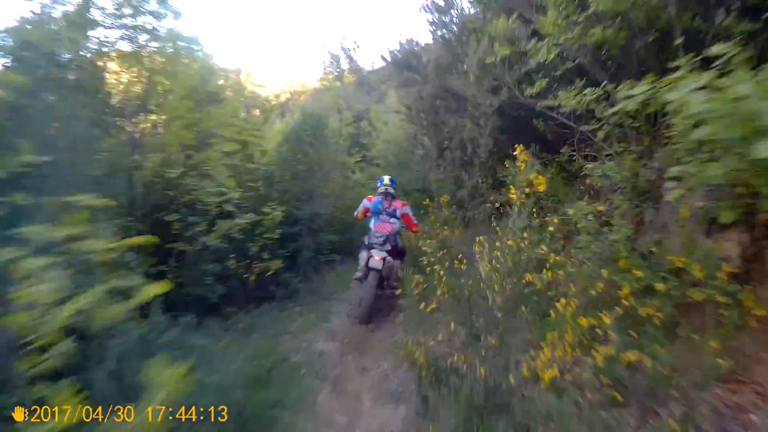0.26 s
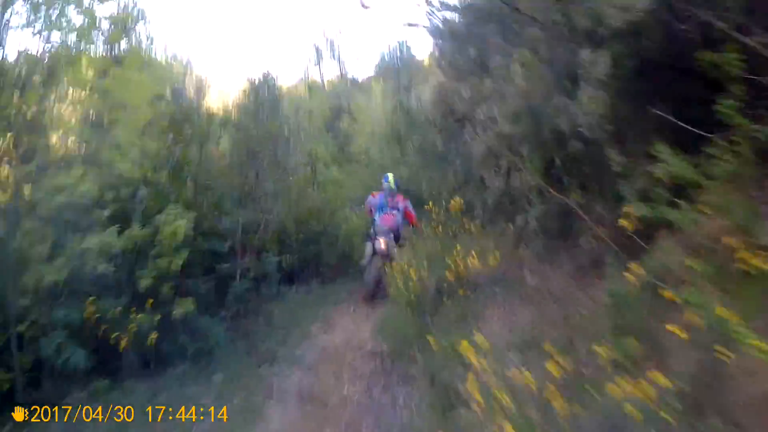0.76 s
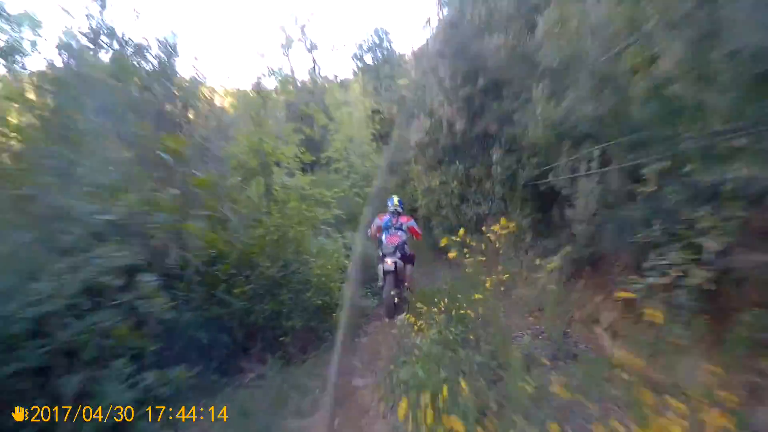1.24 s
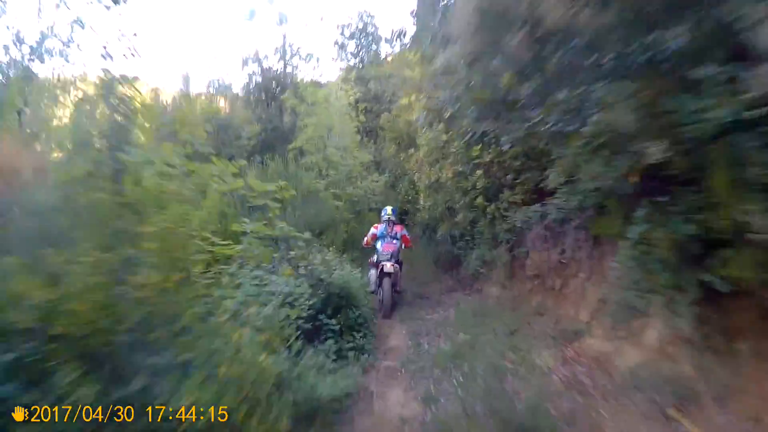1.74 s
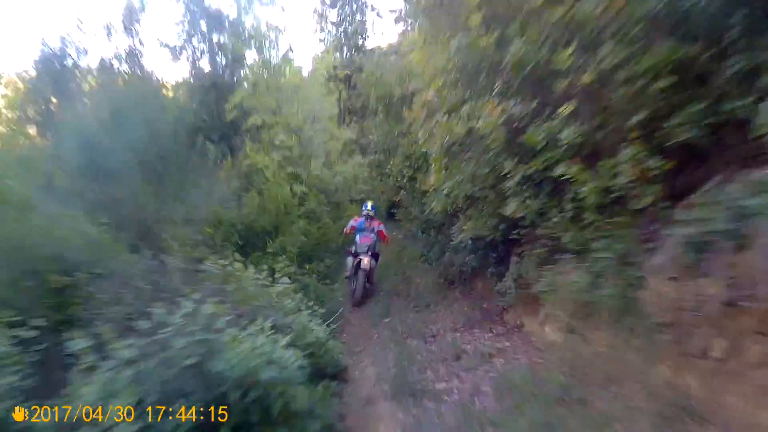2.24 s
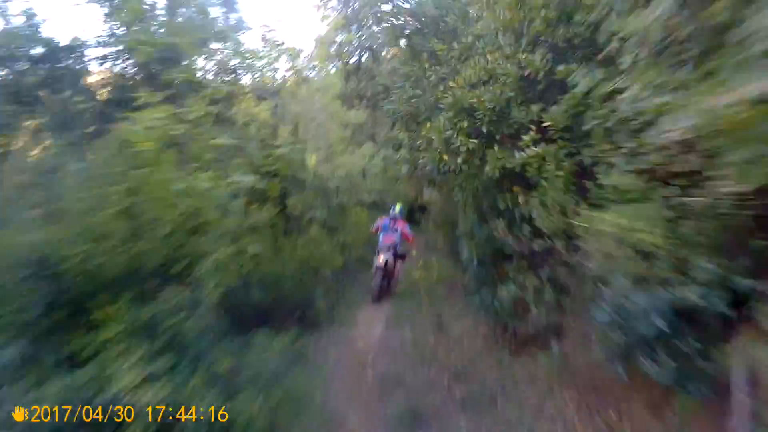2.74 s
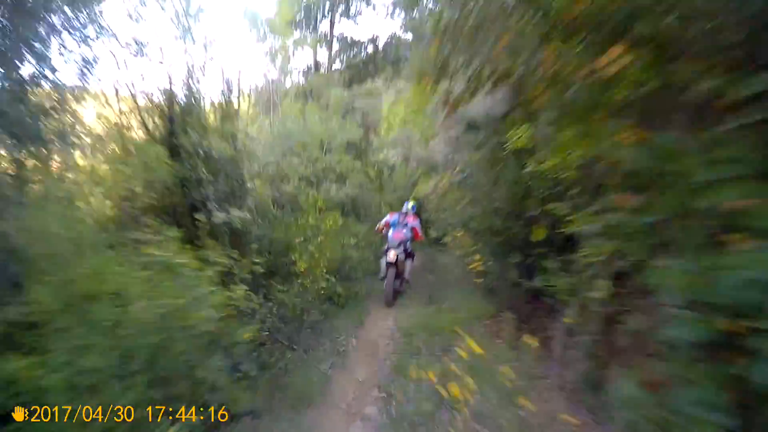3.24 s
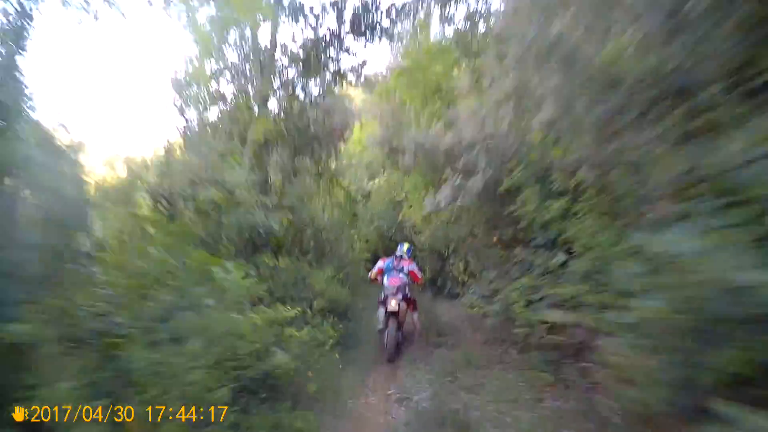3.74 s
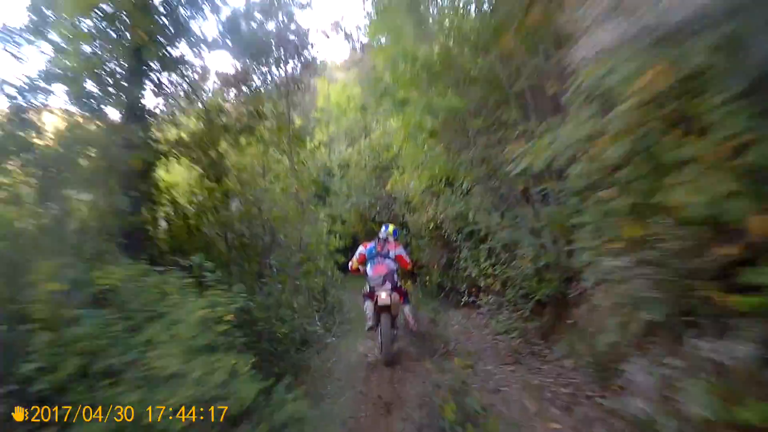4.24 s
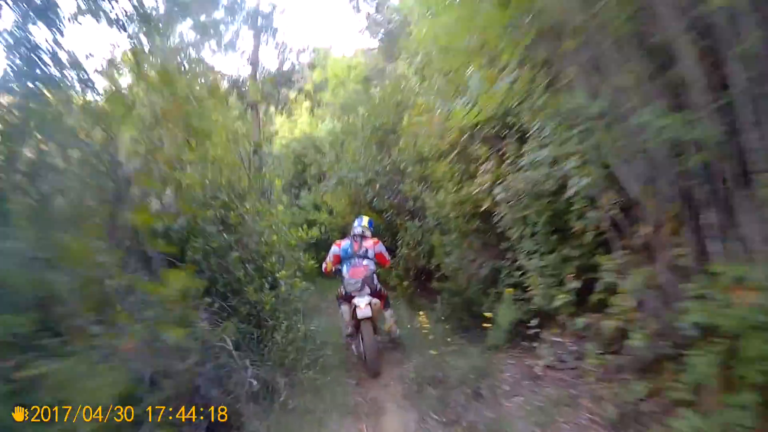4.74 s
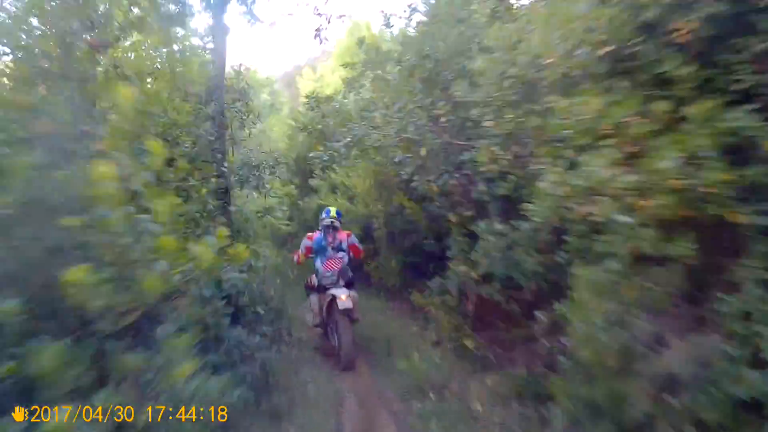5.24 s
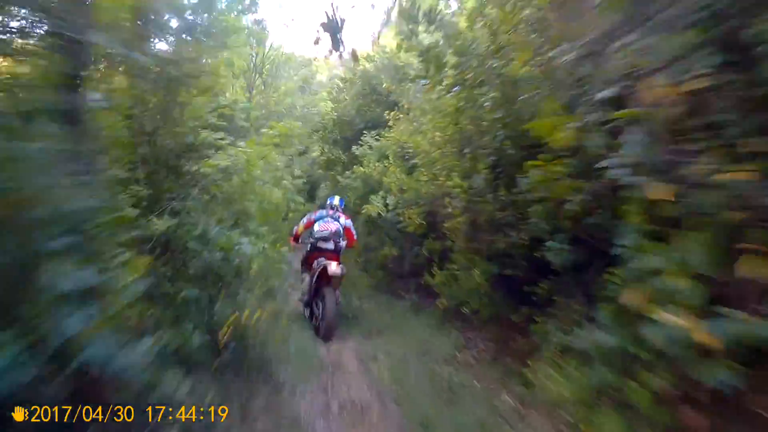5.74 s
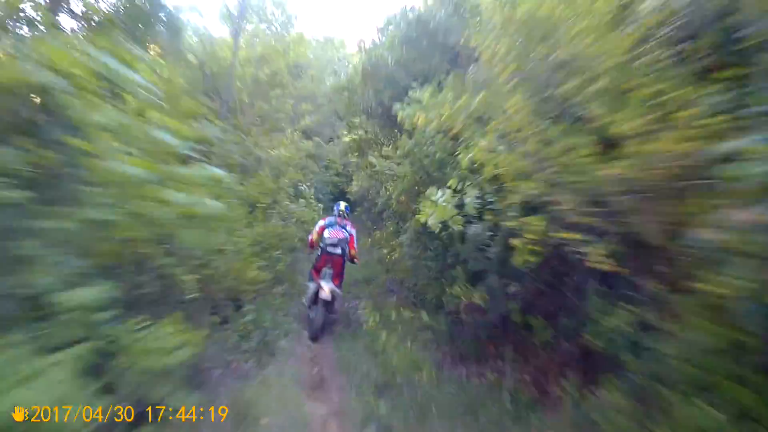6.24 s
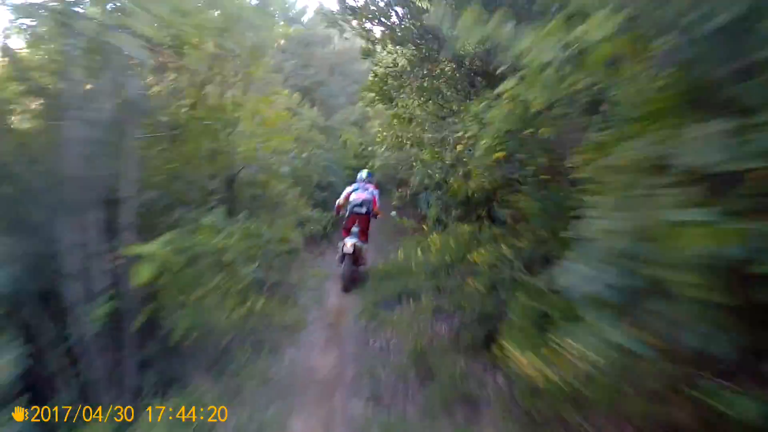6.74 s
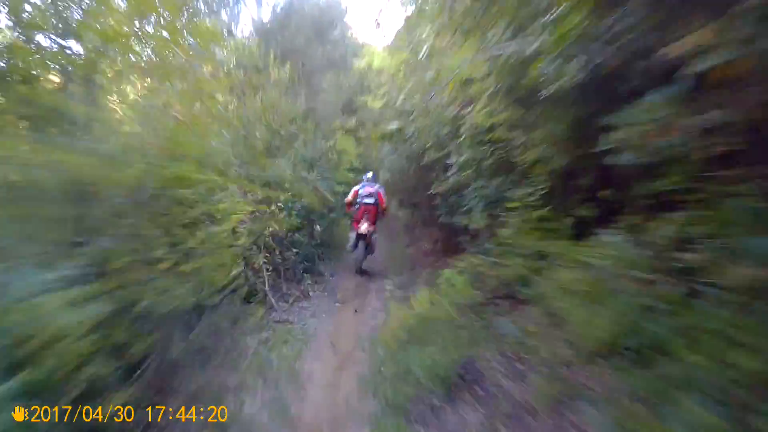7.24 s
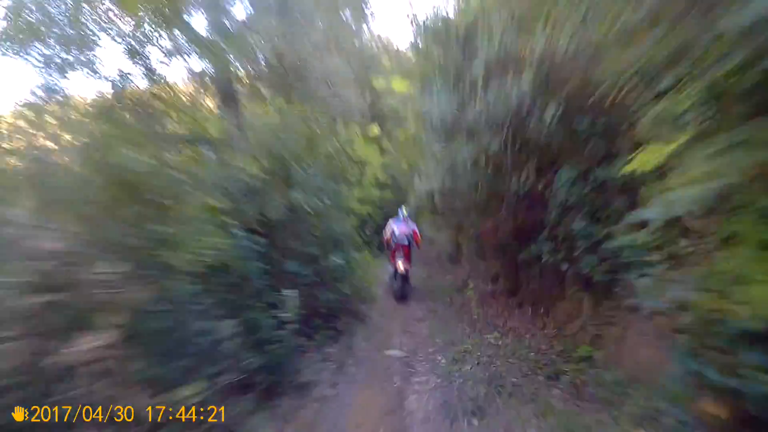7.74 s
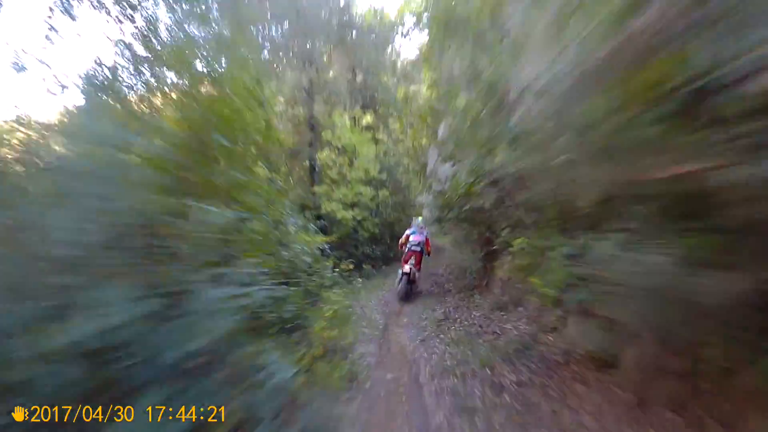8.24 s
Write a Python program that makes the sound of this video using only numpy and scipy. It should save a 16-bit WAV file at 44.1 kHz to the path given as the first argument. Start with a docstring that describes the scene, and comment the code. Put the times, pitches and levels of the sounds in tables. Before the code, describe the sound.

Muffled dirt bike engine and dull wind rumble inside a camera case, faint hiss rising with throttle, broken by sharp branch cracks.

```python
"""Dirt bike on a bushy trail

A camera in a closed case rides on a dirt bike behind a second bike; a faint hum comes and goes.
Wind buffets the case: slow narrow-band noise in gusts over a dull rumble. The engine shakes it with a sine
once a turn and thumps its pipe with pulses; gas and air hiss in the hollow of the case as resonant noise.
The bike ahead, slower pulses with an echo, pulls away for a while.
Twigs tick and whip on the shell: short pushes and scrapes that ring its modes."""
import sys
import numpy as np
from scipy import signal
from scipy.fft import next_fast_len
from scipy.io import wavfile
from scipy.ndimage import uniform_filter1d

SR = 44100
rng = np.random.default_rng(int(sys.argv[2]) if len(sys.argv) > 2 else 0)


def inscribe(sig):
    """Save sig as 16-bit PCM at rate SR to the path in sys.argv[1].

    A 1-D sig is mono; a 2-D sig holds one channel per row.
    Samples are clipped to [-1, 1] before scaling.
    """
    pcm = np.round(np.clip(np.atleast_2d(sig).T, -1, 1) * 32767)
    wavfile.write(sys.argv[1], SR, pcm.astype(np.int16))


N = 374713
T = np.arange(N) / SR

# engine load, heard as gas hiss: (time [s], level [dB])
LOAD = [(0.0, -65.5), (1.15, -66.5), (1.45, -61.5), (1.9, -63.5), (2.39, -60.5), (2.7, -60.5),
        (3.27, -59.5), (3.77, -63.5), (5.3, -66.5), (6.43, -61.5), (7.5, -59), (8.5, -59)]
# All mode tables: (centre [Hz], bandwidth per filter pass [Hz], relative gain [dB])


def undb(db):
    """Decibels to amplitude gain."""
    return 10 ** (np.asarray(db) / 20)


def unit(x):
    """Scale to rms 1."""
    return x / np.sqrt(np.mean(x ** 2))


def columns(table):
    """Table columns joined by straight lines in time."""
    time_s, *rest = np.transpose(table)
    return [np.interp(T, time_s, column) for column in rest]


def ring(x, modes, order=1):
    """Sum of resonances with alternating sign; order 2 darkens the valleys."""
    out = 0
    for k, (hz, width_hz, db) in enumerate(modes):
        b, a = signal.iirpeak(hz, hz / width_hz, fs=SR)
        y = x
        for _ in range(order):
            y = signal.lfilter(b, a, y)
        out = out + (-1) ** k * undb(db) * y
    return out


def hiss(modes, envelope=1.0):
    """White noise under an envelope, through resonances twice, at rms 1."""
    return unit(ring(envelope * rng.standard_normal(N), modes, order=2))


def walk(rate_hz):
    """Random levels held 1 / rate_hz and smoothed by two moving averages of that length."""
    hold = int(SR / rate_hz)
    steps = np.repeat(rng.standard_normal(N // hold + 1), hold)
    return uniform_filter1d(uniform_filter1d(steps, hold), hold)[:N]


def firings(hz, wobble, scatter_db, skip_db):
    """One pulse a cycle, uneven in size, odd ones cut by skip_db; returns cycle count, pulses, sizes."""
    turns = np.cumsum(hz * (1 + wobble * walk(30))) / SR
    count = turns.astype(int)
    cycles = N // 400
    size_db = scatter_db * rng.standard_normal(cycles) - skip_db * (np.arange(cycles) % 2)
    size = undb(size_db)[count]
    starts = np.diff(count, prepend=0) > 0
    return turns, size * starts, size


def swells(table):
    """Pitch and gain of tones that glide evenly while they swell and fade."""
    start_s, length_s, start_hz, end_hz, db = np.transpose(table)
    knots_s = np.ravel([start_s, start_s + length_s], "F")
    hz = np.interp(T, knots_s, np.ravel([start_hz, end_hz], "F"))
    place = np.clip((T - start_s[:, None]) / length_s[:, None], 0, 1)
    arch = np.sqrt(np.abs(np.sin(np.pi * place)))
    return hz, (undb(db)[:, None] * arch).sum(axis=0)


def load():
    """Load above or below its mean, in dB."""
    gas_db, = columns(LOAD)
    return gas_db - gas_db.mean()


def hum():
    """Faint low sine, wavering in pitch and level, that comes and goes."""
    # (start [s], length [s], start pitch [Hz], end pitch [Hz], level [dB])
    hum_swells = [(0.0, .9, 130, 111.8, -67.5), (1.95, 0.94, 107, 107.2, -69),
                  (7.65, 0.925, 113, 103.1, -62)]
    hz, gain = swells(hum_swells)
    tone = np.sin(2 * np.pi * np.cumsum(hz * (1 + 0.023 * walk(5))) / SR)
    return gain * undb(4.1 * walk(3.6)) * tone


def wind():
    """Slow pressure swings whose size follows the gusts, over a dull rumble."""
    # gusts that thump the case: (middle [s], full width at 1/e [s], level [dB])
    gusts = [(0.04, 0.11, -42), (0.16, 0.09, -39.5), (0.29, 0.042, -43.5), (0.5, 0.25, -46.5),
             (0.66, 0.07, -43), (0.84, .12, -31.5), (1.04, 0.37, -51.5), (1.3, 0.18, -41.5),
             (1.75, .16, -47), (1.89, 0.18, -46.5), (2.27, 0.049, -50), (2.419, 0.27, -49),
             (2.98, 0.15, -41.5), (3.23, .16, -42), (3.361, 0.042, -50), (3.471, 0.16, -45.5),
             (3.829, 0.18, -50.5), (4.04, 0.097, -50), (4.2, 0.076, -50), (4.44, 0.12, -38),
             (4.72, 0.1, -42.5), (4.879, 0.18, -50.5), (5.44, 0.049, -32.5), (5.57, 0.15, -40.5),
             (5.79, 0.164, -43.5), (6.05, .08, -42.5), (6.17, .12, -44.5), (6.42, .2, -40.5),
             (6.55, 0.046, -56), (6.86, 0.18, -45.5), (7.02, 0.092, -45), (7.14, 0.16, -34),
             (7.39, 0.11, -51), (7.58, 0.1, -40), (8.02, 0.12, -49.5), (8.37, .12, -45)]
    calm_db = -59  # buffeting between gusts
    rumble_db, rumble_follow = -61.5, 0.43  # level at mean load; dB per dB of load

    noise = ring(rng.standard_normal(N), [(26.37, 15.8, 0)], order=2)
    swing = signal.hilbert(noise, next_fast_len(N))[:N]
    swing = swing.real / np.abs(swing) ** 0.62  # eddies of like strength
    strength = undb(calm_db)
    for middle_s, width_s, db in gusts:
        strength = strength + undb(db) * np.exp(-(2 * (T - middle_s) / width_s) ** 2)
    lowpass = signal.butter(3, 62, fs=SR, output="sos")
    buffet = signal.sosfiltfilt(lowpass, unit(swing) * strength)

    rumble = ring(rng.standard_normal(N), [(70, 77, 3), (146, 238, 1.0), (430, 577, -5.5)])
    return buffet + unit(rumble) * undb(rumble_db + rumble_follow * load() + 0.77 * walk(5.0))


def bike_ahead():
    """Slow even thumps of a single cylinder, each answered from the far end of its pipe."""
    # (time [s], firing rate [Hz], level [dB])
    ahead = [(4.3, 25.4, -57), (4.49, 26.86, -69.5), (4.92, 25.44, -61), (5.07, 28.24, -59),
             (5.24, 27.27, -65), (5.34, 30.08, -63.5), (5.76, 29.68, -61.5), (6.03, 32.94, -61.5),
             (6.9, 37.3, -70)]
    far_pipe_modes = [(136, 77, 2), (263, 116, -1), (960, 180, -8.5)]
    echo_s, echo_gain = 0.0064, 1

    hz, level_db = columns(ahead)
    _, pulses, _ = firings(hz, wobble=.01, scatter_db=1.1, skip_db=0)
    pulses = pulses + echo_gain * np.roll(pulses, int(echo_s * SR))
    present = (T > ahead[0][0]) & (T < ahead[-1][0])
    heard = uniform_filter1d(1. * present, size=SR // 4)
    return unit(ring(pulses, far_pipe_modes)) * undb(level_db) * heard


def twigs():
    """Each touch is a short scrape that rings the shell, plus a push for its low modes."""
    # peak level per band: (time [s], jolt [dB], thud [dB], ping [dB], swish [dB], sizzle [dB], contact [ms])
    touches = [(0.6777, -66, -43, -55.5, -56, -73, 14), (0.7324, -50, -63, -54, -61, -77, 16),
               (0.7637, -44, -56, -53, -53, -75, 12), (0.787, -53, -45, -42.5, -69, -80, 3.8),
               (0.8777, -46.5, -42.5, -51.5, -72, -84, 9.3), (1.2574, -31, -24, -32.5, -47, -86, 11),
               (1.267, -28, -26, -12, -33, -70, 6), (1.2707, -40, -22, -21, -13, -42, 5.3),
               (1.2784, -42, -28, -12.5, -20, -22.5, 5), (1.2846, -39, -21, -18, -17, -50, 5),
               (1.2903, -34, -16.5, -20, -20, -50, 2.9), (1.2969, -33, -17, -18, -32, -38, 18.7),
               (1.314, -43, -19, -18.5, -48, -50, 5.6), (1.3183, -42, -22, -14, -50, -51, 11.5),
               (1.3259, -46, -21.5, -28, -32, -48, 13), (1.3311, -43, -16.5, -29, -50, -68, 4),
               (1.3423, -34, -33, -33, -34, -48, 11), (1.359, -52, -42, -26, -33, -50, 5.9),
               (1.3634, -42, -26.5, -22, -51, -49, 4), (1.3729, -43, -33, -43, -38, -60, 11),
               (1.3838, -54, -41, -37, -40, -55, 4.2), (2.951, -53, -52, -43, -65, -70, 5),
               (4.4444, -54, -45, -40.5, -72, -83, 3.6), (5.3286, -60, -51, -48.5, -59, -81, 5),
               (5.409, -55, -52, -55, -66, -83, 9), (5.43, -50, -50, -55, -66, -83, 9.4),
               (5.4404, -45, -45, -52, -57, -83, 7), (6.443, -56, -49, -40.5, -62, -77, 4.4),
               (6.674, -51, -37, -40, -56, -82, 5.6), (6.678, -55, -25.5, -27, -51, -62, 5.8),
               (6.6825, -38, -21, -35.5, -37, -34.5, 10.7), (6.6874, -44, -29, -39, -27, -39, 5.4),
               (6.697, -43, -28, -54, -50, -65, 14), (6.709, -41, -33.5, -60, -52, -63, 13),
               (7.1642, -54, -46, -48, -55, -79, 6.6), (7.3395, -59, -48, -46, -65, -77, 5),
               (7.531, -58, -56, -41, -68, -80, 4.1), (7.5584, -42, -38, -27, -26, -70, 4),
               (7.5613, -12, -12, -3, 0.5, -40, 4.73), (7.5678, -11.5, -15.5, -28, -31, -60, 3.2),
               (7.5748, -27, -18.5, -13, -16.5, -42.5, 7.4), (7.5794, -18.5, -16, -24, -18.5, -31.5, 2.9),
               (7.5829, -20, -9.5, -9.5, -18, -32.5, 1.6), (7.5871, -25, -14, -18, -25.5, -37.5, 4),
               (7.5922, -29, -25, -29, -18, -45.5, 6.4), (7.5991, -31, -42.5, -34, -32, -31, 7.9),
               (8.1792, -67, -49, -47.5, -69, -78, 5.2), (8.4546, -58, -52.5, -47, -61, -73, 6.4)]
    # shell modes, one table per band
    jolt_modes = [(41.7, 19, 0.5), (84.7, 59, -1.5)]
    thud_modes = [(178, 64, 0), (337, 86, 7), (517, 95, 6.5), (745, 370, -1.5)]
    knock_modes = [(1544, 380, 6.5), (1130, 660, -0.5), (630, 360, -5)]
    ping_modes = [(3162, 430, -2.5), (2592, 2300, -16)]
    swish_modes = [(4510, 1300, 6.5), (5530, 1300, 2), (7260, 2200, 3.5), (9100, 2400, -24)]
    sizzle_modes = [(11100, 1200, 1.5), (13700, 2500, -3)]
    length = 8192  # samples per touch

    out, t = np.zeros(N + length), np.arange(length) / SR
    for start_s, jolt_db, thud_db, ping_db, swish_db, sizzle_db, contact_ms in touches:
        # 1 dB above a point a fifth of the way from ping to thud
        knock_db = 1 + ping_db + 0.2 * (thud_db - ping_db)
        contact = t / (max(contact_ms, .3) / 1000)  # time in contact lengths
        drag = np.exp(-3 * contact) + 0.3 * np.exp(-.8 * contact)  # leaves trail after the stem
        # cubed noise: a scrape is made of separate snaps
        snaps = rng.standard_normal(length) ** 3
        scrape = snaps * np.minimum(contact / 0.21, 1) * drag
        push = contact * np.exp(-7 * contact)
        bands = [(push, jolt_modes, jolt_db, 1), (push, thud_modes, thud_db, 1),
                 (scrape, knock_modes, knock_db, 2), (scrape, ping_modes, ping_db, 2),
                 (scrape, swish_modes, swish_db, 2), (scrape, sizzle_modes, sizzle_db, 2)]
        i = int(start_s * SR)
        for force, modes, db, order in bands:
            y = ring(force, modes, order)
            out[i:i + length] += y * undb(db) / np.abs(y).max()
    return out[:N]


def whine():
    """Ragged strand in the hiss: narrow noise around a gliding pitch."""
    # (start [s], length [s], start pitch [Hz], end pitch [Hz], level [dB])
    whine_swells = [(2.15, .47, 1312, 1350, -58), (2.72, 0.29, 1480, 1505, -61.5),
                    (3.1, 0.34, 1536, 1520, -69)]
    hz, gain = swells(whine_swells)
    phase = 2 * np.pi * np.cumsum(hz) / SR
    return unit(walk(130) * np.sin(phase) + walk(130) * np.cos(phase)) * gain


def throttle_bursts():
    """Exhaust gain: each burst opens linearly, holds, and dies away over a shut-throttle level."""
    # (start [s], time to start of decay [s], level [dB])
    exhaust_bursts = [(0.0, 0.029, -66), (0.93, 0.15, -68), (1.17, 0.52, -58.5), (1.97, 0.26, -56.5),
                      (2.34, 0.56, -53), (2.9, 0.46, -59), (3.46, 0.3, -63.5), (3.93, 0.45, -71.5),
                      (4.75, .08, -67), (5.0, .1, -69), (5.4, 0.059, -73), (5.57, 0.065, -63.5),
                      (5.89, 1, -62), (6.86, 0.19, -49.5), (7.22, 0.19, -54.5), (7.6, 0.63, -61),
                      (8.26, 0.31, -57.5)]
    open_s, close_s, coast_db = 0.072, 0.063, -76.5
    gain = undb(coast_db)
    for start_s, hold_s, db in exhaust_bursts:
        since_s = T - start_s
        rise = np.clip(since_s / open_s, 0, 1)
        fall = np.exp(-np.maximum(since_s - hold_s, 0) / close_s)
        gain = gain + undb(db) * rise * fall
    return gain


def exhaust(pulses):
    """Firing pulses and a blur of noise ring the pipe; throttle bursts set the level."""
    pipe_modes = [(265.5, 77, 6.5), (118, 60, -11.5), (640, 89, -17.5), (194, 44, -1.5)]
    blur = 0.43 * hiss(pipe_modes)
    thumps = unit(ring(pulses, pipe_modes, order=2))
    return unit(thumps + blur) * throttle_bursts() * undb(2.2 * walk(10))


def gas_rasp(puff):
    """Gas noise puffing once a turn, in a midrange band that follows the load."""
    rasp_modes = [(1233, 390, 9.5), (1470, 337, -4.5)]
    gas_db, = columns(LOAD)
    return hiss(rasp_modes, puff) * undb(gas_db + 1.4 + 1.7 * walk(7.8))


def case_hiss(puff):
    """Gas and air noise in the hollow of the case, with a shared flutter in level."""
    hollow_modes = [(621.5, 59, 1), (880, 170, -0.5), (3090, 570, -4.5), (1980, 410, -20)]
    air_modes = [(4130, 330, 8.5), (5000, 740, 6.5), (7560, 3700, 6.5), (12900, 250, 1),
                 (11500, 5000, -29.5)]
    hollow_db, air_db, follow = -64, -72, 0.97  # levels at mean load; dB per dB of load
    flutter = walk(28) + 0.23 * walk(5.3)  # quick random flutter in the level of the hiss
    follow_db = follow * load()  # slightly less than the rasp
    hollow = hiss(hollow_modes, puff) * undb(hollow_db + follow_db + 1.4 * flutter)
    air = hiss(air_modes, .9 + puff) * undb(air_db + follow_db + 1.6 * flutter)
    return hollow + air


def own_bike():
    """Shake at crank rate, firings in the pipe, and hiss that puffs once a turn."""
    # (time [s], crank rate [Hz], shake level [dB])
    crank = [(0.0, 39.76, -43.5), (0.42, 41.6, -48.5), (0.7, 38.44, -43.5), (0.92, 38.82, -41),
             (1.37, 41.69, -49.5), (1.58, 46.23, -50), (1.85, 44.2, -48.5), (2.06, 44.8, -53.5),
             (2.6, 51.94, -53.5), (2.7, 57.09, -66), (3.41, 61.84, -53), (3.55, 54.1, -57),
             (3.81, 59.4, -49.5), (4.45, 51.87, -55.5), (4.68, 51.82, -57), (4.83, 45.7, -44),
             (5.16, 42.8, -51.5), (5.66, 44.29, -44), (6.22, 45.68, -67), (6.36, 48.46, -70),
             (6.74, 53.38, -59), (7.08, 57.07, -52), (7.41, 59.16, -55.5), (7.69, 60.57, -53.5),
             (8.4, 64.5, -59.5), (8.5, 61.2, -62.5)]
    hz, shake_db = columns(crank)
    turns, pulses, size = firings(hz, wobble=.022, scatter_db=2.5, skip_db=1.0)
    shake = np.sin(2 * np.pi * turns) * undb(shake_db + 0.89 * walk(12))
    puff = 0.95 + size * np.exp(-(turns % 1) / .3)  # decays over 0.3 turn
    return shake + whine() + exhaust(pulses) + gas_rasp(puff) + case_hiss(puff)


def scene():
    """Everything reaches one microphone inside the case."""
    return (hum() + wind() + bike_ahead() + twigs() + own_bike())[None]


def record(dry):
    """The amplifier rounds the loudest peaks, then a steep low-pass cuts the top."""
    ceiling, top_hz = 0.87, 15900
    rounded = ceiling * np.tanh(dry / ceiling)
    return signal.sosfilt(signal.ellip(10, .2, 80, top_hz, fs=SR, output="sos"), rounded)


dry = scene()
out = record(dry)
inscribe(out)
```